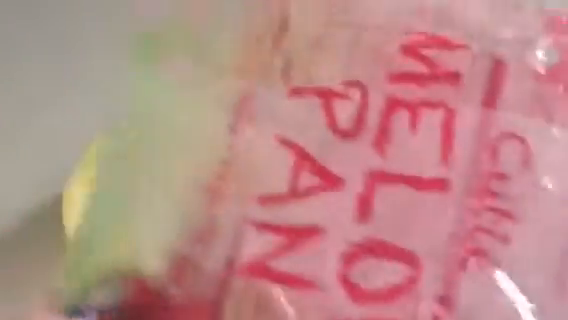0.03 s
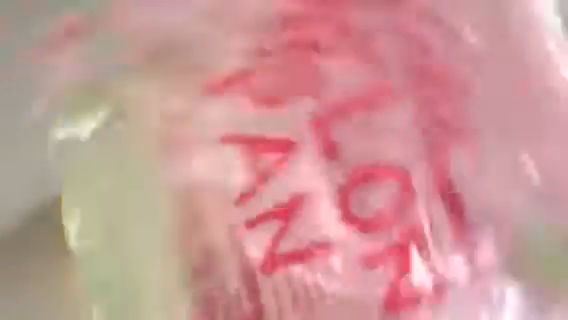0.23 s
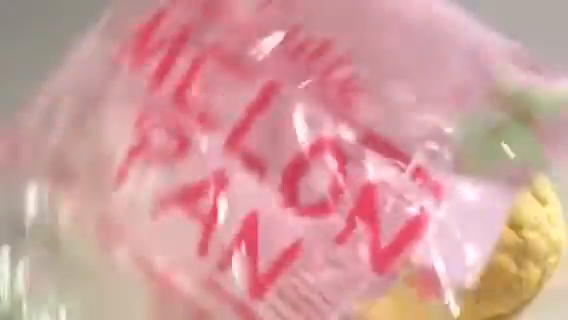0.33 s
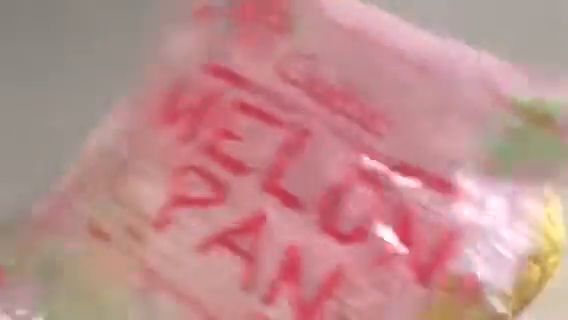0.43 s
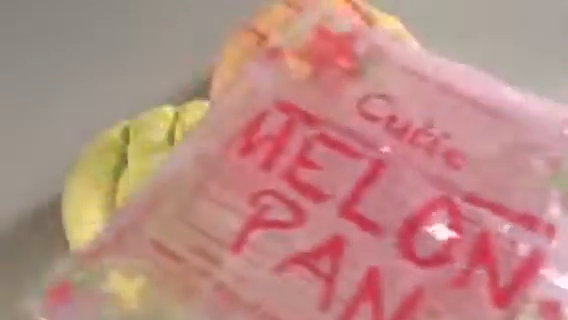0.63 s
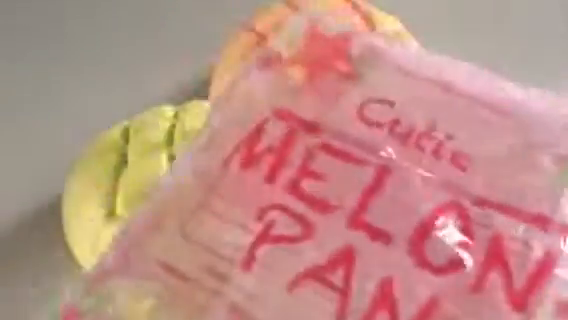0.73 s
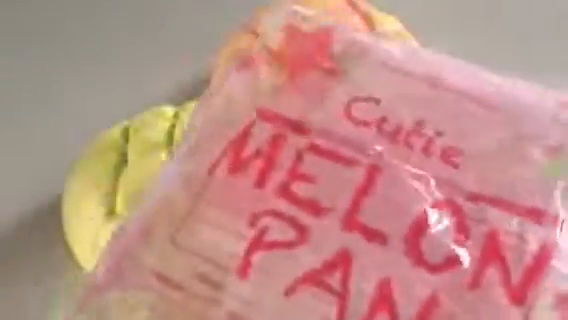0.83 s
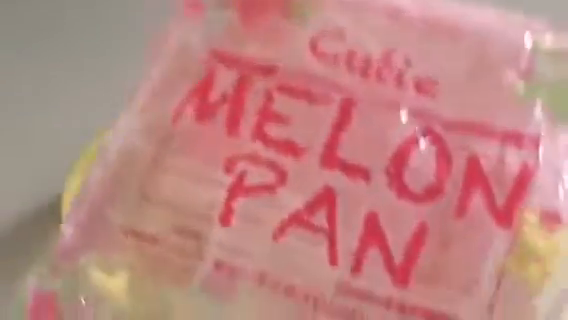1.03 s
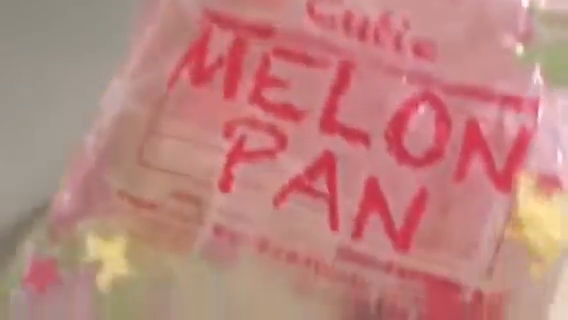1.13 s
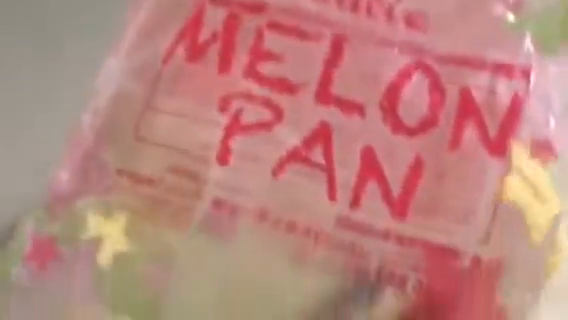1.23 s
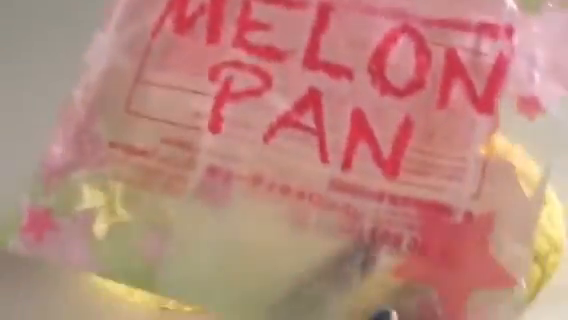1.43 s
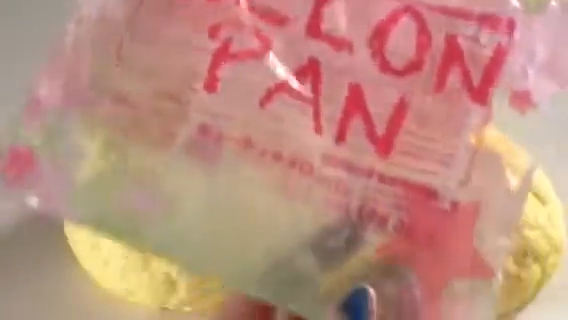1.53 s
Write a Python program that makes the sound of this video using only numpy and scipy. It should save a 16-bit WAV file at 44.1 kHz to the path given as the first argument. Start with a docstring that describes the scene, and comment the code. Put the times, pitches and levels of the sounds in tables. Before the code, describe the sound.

Thin plastic wrapper crinkling close to a small microphone indoors. Small crackles quicken from the start to a bright, loudest snap at 0.22 s, with another strong one at 0.35. Uneven clusters follow around 0.5, 0.65-0.83 and 0.97-1.13 s, then a crisp pair near 1.33, a gap, and light crackles from 1.52 to 1.6. Faint finger friction, short room reflections, low throbbing appliance hum and soft hiss.

```python
"""Thin plastic wrapper handled close to a small microphone in a quiet room.
From the start an appliance hums and throbs (wavering tones) over the hiss of the room (shaped noise),
and fingers slide faintly on the film (noise through resonances).
Soon creases buckle with short snaps, each ringing a few patches of film, the loud ones more.
A wall returns one echo of the handling and a short tail of decaying noise."""
import sys
import numpy as np
from scipy import signal
from scipy.fft import rfft, irfft
from scipy.io import wavfile
from scipy.ndimage import uniform_filter1d

SR = 44100
rng = np.random.default_rng(int(sys.argv[2]) if len(sys.argv) > 2 else 0)


def dump_mix(stems):
    """Bounce the given channels to the path in sys.argv[1] as a 16-bit WAV at rate SR."""
    frames = np.atleast_2d(stems).T  # one column per channel
    limited = np.clip(frames, -1, 1)  # hard clip at full scale
    pcm = np.round(limited * 32767).astype(np.int16)
    wavfile.write(sys.argv[1], SR, pcm)


N = 70560  # length in samples


def undb(db):
    """Turn decibels into an amplitude factor."""
    return 10 ** (np.asarray(db, float) / 20)


def level(x, db):
    """Scale a sound to an rms level in dB."""
    return x * undb(db) / np.sqrt(np.mean(x ** 2))


def ring(x, hz, width):
    """Pass a sound through a resonance with gain 1 at its centre; a narrower width in Hz rings longer."""
    centre = min(hz, 0.42 * SR)
    sharpness = max(hz / width, 0.6)
    b, a = signal.iirpeak(centre, sharpness, fs=SR)
    return signal.lfilter(b, a, x)


def walk(rate):
    """Slow random wander with spread near 1, made by smoothing `rate` random steps per second."""
    step = int(SR / rate)
    stairs = np.repeat(rng.standard_normal(N // step + 1), step)
    smooth = uniform_filter1d(uniform_filter1d(stairs, step), step)
    return 0.61 * smooth[:N]


# Low tones of the appliance. Each row: pitch in Hz, middle level in dB, size of its waver in dB.
LOW_HUM = [(54.06, -63, 4.5), (58, -62.5, -4), (92.7, -56, -1), (116.15, -70, 0), (120.5, -62, 3.5)]
HUM_IN_STEP_S = 0.02336  # all low tones swing upward through zero at this moment
HUM_FADE_DB_PER_S = -0.5


def low_hum():
    """Appliance tones, each wavering a little; tones close in pitch beat against each other as a throb."""
    t = np.arange(N) / SR
    tones = 0
    for hz, db, waver_db in LOW_HUM:
        loudness = undb(db + waver_db * walk(10.7))
        tones = tones + loudness * np.sin(2 * np.pi * hz * (t - HUM_IN_STEP_S))
    fade = undb(HUM_FADE_DB_PER_S * (t - t.mean()))
    return np.sqrt(2) * tones * fade  # the root of 2 makes the tone levels rms


# How the upper hum comes and goes, before a small random waver.
# Each row: time in seconds, level of the lower tone in dB, level of the higher tone in dB.
UPPER_HUM = [(0.0, -95, -68), (0.062, -78, -67), (0.19, -71.5, -69.5), (0.342, -72, -62),
             (0.422, -71.5, -76.5), (0.502, -64, -60.5), (0.582, -63, -80), (0.708, -77, -60.5),
             (0.774, -70, -72), (1.024, -66, -66), (1.108, -70, -72.5), (1.368, -72, -67),
             (1.474, -65.5, -75), (1.6, -63, -68.5)]
# The middle pitches of the lower and the higher tone in Hz.
UPPER_HUM_HZ = (181.9, 276)


def upper_hum():
    """Two overtones of the appliance that waver in level and in pitch."""
    t = np.arange(N) / SR
    times, *levels = np.array(UPPER_HUM).T
    tones = 0
    for hz, db in zip(UPPER_HUM_HZ, levels):
        loudness = undb(np.interp(t, times, db) + 1.5 * walk(14))
        pitch = hz + 1.86 * walk(7.74)
        tones = tones + loudness * np.sin(2 * np.pi * np.cumsum(pitch) / SR)
    return np.sqrt(2) * tones


# Colour of the room noise. Each row: frequency in Hz, relative strength per Hz in dB.
AIR_COLOUR = [(25, -28), (45, -0.5), (100, -1), (200, -6.5), (350, -10), (600, -19), (1100, -23.5),
              (2500, -27), (5000, -32), (9000, -35.5), (12500, -34), (15500, -33.5)]
AIR_DB, AIR_SWELL_DB = -62.5, 3  # level before the slow swell, size of the swell
AIR_TOP_HZ = 15800


def air():
    """Smooth rumble and hiss of room and microphone: white noise, coloured and slowly swelling."""
    f = np.fft.rfftfreq(N, 1 / SR) + 1  # 1 Hz more keeps the logarithm finite
    hz, db = np.array(AIR_COLOUR).T
    colour = undb(np.interp(np.log(f), np.log(hz), db)) * (f > 20) * (f < AIR_TOP_HZ)
    noise = irfft(rfft(rng.standard_normal(N)) * colour, N)
    return level(noise, AIR_DB) * undb(AIR_SWELL_DB * walk(1.48))


# Fingers sliding on the film, before the random grain. Each row: time in seconds, level in dB.
SLIDE_LEVEL = [(0, -67.5), (0.051, -71.5), (.1, -79.5), (.2, -75.5), (.4, -69.5), (0.571, -84),
               (0.601, -70), (.64, -70), (.7, -73.5), (.8, -99), (1.1, -83), (1.25, -88), (1.501, -81),
               (1.6, -70.5)]
# Colour of that hiss. Each row: resonance in Hz, its width in Hz, relative level in dB.
SLIDE_RINGS = [(5800, 600, -10), (4000, 4100, -5.5), (12500, 1700, -11)]


def slide():
    """Grainy friction hiss of skin on film: noise through resonances, its level shaking fast and slowly."""
    hiss = 0
    for hz, width, db in SLIDE_RINGS:
        hiss = hiss + undb(db) * level(ring(rng.standard_normal(N), hz, width), 0)
    times, db = np.array(SLIDE_LEVEL).T
    pressure_db = np.interp(np.arange(N) / SR, times, db)
    grain_db = 2.0 * walk(42.3) + 6.0 * walk(600)
    return level(hiss, 0) * undb(pressure_db + grain_db)


TICKS_PER_S, TICK_HZ = 78, 1180
TICK_DB, TICK_SPREAD_DB = -89.5, 2.5  # rms of all ticks together, spread from tick to tick


def ticks():
    """A sprinkle of faint dull ticks: random impulses through two broad resonances."""
    strengths = undb(TICK_SPREAD_DB * rng.standard_normal(N))
    impulses = (rng.random(N) < TICKS_PER_S / SR) * strengths
    dull = ring(ring(impulses, TICK_HZ, 1000), TICK_HZ, 1800)
    return level(dull, TICK_DB)


# How the film behaves by pitch.
# Each row: ring in Hz, decay of the buckling in seconds, sharpness (ring pitch over its width).
FILM = [(467, 0.0021, 1.37), (1230, 0.0022, 3.6), (3020, 0.0017, 4.74), (6000, 0.0017, 6.46),
        (12300, 0.001, 8.9)]
LEVEL_S, RISE_S = 0.004, 0.0001  # patch levels are rms over LEVEL_S; the rattle rises within RISE_S
KICK = 4.65  # size of the jolt against the rattle
STAGGER_S = 0.0003  # typical delay of a patch's jolt
SKIRT = 2.47  # width of the second resonance over the first


def snap(rings, chance):
    """A jolt and a short rattle of buckling excite the patches of film, each a double resonance."""
    t = np.arange(chance.shape[1]) / SR
    film_hz, film_decay, film_sharpness = np.array(FILM).T
    out = 0
    for (hz, db), noise in zip(rings, chance):
        decay = np.interp(np.log(hz), np.log(film_hz), film_decay)
        sharpness = np.interp(np.log(hz), np.log(film_hz), film_sharpness)
        burst = noise * (1 - np.exp(-t / RISE_S)) * np.exp(-t / decay)
        # the last two noise values choose the moment and direction of the jolt
        jolt_at = int(abs(noise[-1]) * STAGGER_S * SR)
        burst[jolt_at] += KICK * np.sign(noise[-2]) * np.sqrt(decay * SR) / 4
        width = hz / sharpness
        patch = ring(ring(burst, hz, width), hz, SKIRT * width)
        out = out + patch * undb(db) * np.sqrt(LEVEL_S * SR / np.sum(patch ** 2))
    return out


SIDEWAYS_BLUR_HZ = 1120  # the rings merge over this width


def merged(x):
    """Towards the walls: the snap as one short click, its rings smeared and all frequencies in step."""
    blur_bins = int(SIDEWAYS_BLUR_HZ * len(x) / SR)
    power = uniform_filter1d(np.abs(rfft(x)) ** 2, blur_bins, mode="mirror")
    click = irfft(np.sqrt(np.abs(power)), len(x))
    late_click = np.roll(click, SR // 2000)  # moved half a millisecond later
    return late_click * (np.arange(len(x)) < len(x) // 2)


# The clear snaps of the creases.
# Each row: start in seconds, then its patches from large to small, each as ring in Hz, level in dB.
SNAPS = [(0.0215, [(1040, -63.5), (3010, -60.5), (4090, -54), (6370, -66), (8600, -61.0), (10770, -65)]),
         (0.069, [(1260, -66)]), (0.096, [(670, -74), (1010, -57.5), (1870, -60)]), (0.102, [(570, -61),
         (1020, -53.0), (1850, -57), (2780, -61), (3780, -68.0), (5170, -66)]), (0.1101, [(500, -66.5),
         (860, -62), (5500, -66), (9000, -75)]), (0.115, [(1040, -57), (1570, -67), (2030, -58.5),
         (3150, -70)]), (0.1419, [(1060, -59.5), (1510, -70), (3280, -61), (4100, -70)]),
         (0.1536, [(600, -58), (1230, -55.5), (1680, -57), (2150, -55), (2760, -57.5), (3810, -61),
         (4780, -70), (5780, -59)]), (0.1815, [(1150, -50), (1520, -54), (2210, -51), (3100, -55.5),
         (4410, -54), (5600, -57), (6820, -59.5), (8820, -56)]), (0.1961, [(880, -74), (1270, -56),
         (1980, -57), (4510, -58), (5530, -55)]), (0.2008, [(640, -57), (1250, -50.5), (2100, -50),
         (3310, -50), (4040, -52), (6510, -62.5), (8600, -62)]), (0.225, [(520, -59.5), (1610, -39),
         (2240, -40.5), (3010, -33.5), (4520, -28), (5900, -36), (8680, -34), (12060, -32.0)]),
         (0.243, [(830, -52.5), (1410, -54), (3090, -48), (3910, -49), (4840, -63), (6380, -53)]),
         (0.2706, [(610, -66.0), (1250, -57), (5380, -52.5)]), (0.3507, [(520, -50), (1150, -46),
         (1630, -55), (3000, -49.5), (5380, -43), (8180, -45.0), (11400, -42.5), (14970, -51)]),
         (0.369, [(920, -61), (1560, -75), (2150, -59), (3560, -53.5)]), (0.386, [(930, -61), (1260, -57.5),
         (1880, -69)]), (0.4484, [(1160, -60.5), (2030, -60.5)]), (0.4835, [(1160, -59)]),
         (0.4864, [(1090, -58), (1540, -56.0), (3230, -66)]), (0.4887, [(470, -57.5), (1060, -47.5),
         (1650, -49.5), (3010, -52.5), (3820, -60), (5370, -61.0)]), (0.5087, [(1440, -56), (1930, -63)]),
         (0.532, [(1000, -51.0), (1610, -51.5), (2150, -56), (3840, -64), (6520, -66)]),
         (0.5436, [(1070, -55.5), (2360, -65), (3500, -59), (4300, -72)]), (0.6274, [(1010, -59)]),
         (0.6407, [(1150, -58)]), (0.6477, [(990, -52), (1430, -53), (1910, -51.5), (3660, -48),
         (4940, -56), (7580, -68)]), (0.655, [(550, -56), (1290, -42), (1660, -44), (2500, -45.5),
         (3730, -53), (5030, -57), (6230, -54), (8790, -53.5), (10970, -56.5)]), (0.6879, [(2340, -58.5),
         (3390, -70), (6150, -63.5)]), (0.69, [(450, -58.0), (970, -55)]), (0.702, [(550, -59), (1200, -49),
         (1710, -53), (2790, -56.5), (3510, -51), (5290, -48.5), (7430, -57), (12550, -64)]),
         (0.715, [(500, -61), (1100, -54), (1820, -59), (3870, -59.5), (6210, -53.5), (9420, -67),
         (13540, -63)]), (0.728, [(680, -62), (1770, -60.5)]), (0.7642, [(1120, -62.0), (1490, -60.5),
         (1930, -53.5), (3740, -43), (4600, -45), (6880, -58.5), (9080, -61.5)]), (0.8163, [(550, -52.5),
         (1270, -43.5), (2000, -56.5), (2560, -54.0), (3430, -58), (6130, -56.5)]), (0.8306, [(1020, -46.5),
         (1980, -59), (3320, -51.5), (4620, -52.5), (5660, -46), (7880, -60.5), (10970, -57)]),
         (0.9291, [(460, -66.0), (880, -59.0), (1430, -57), (2300, -59), (4060, -68)]),
         (0.956, [(1270, -65)]), (0.9688, [(500, -56), (970, -46), (2220, -57), (3360, -51), (4480, -51.5),
         (6690, -53.5), (11350, -72)]), (0.9983, [(900, -50), (1710, -58), (2550, -65), (3520, -76)]),
         (1.002, [(890, -49.5), (1260, -62), (1630, -65.0)]), (1.016, [(1090, -68)]),
         (1.026, [(1120, -47.5), (1700, -51), (2360, -53), (4510, -71), (6210, -48), (8820, -57.5),
         (11900, -66.5)]), (1.0394, [(990, -57.5)]), (1.053, [(1070, -69), (2920, -69)]),
         (1.0692, [(930, -59), (2300, -69)]), (1.0865, [(990, -52), (1820, -61.5), (3650, -75),
         (6560, -57)]), (1.0884, [(450, -60), (720, -53), (1480, -54.0), (2270, -55), (3400, -41.5),
         (4230, -62), (5310, -49), (6800, -45.0), (9030, -50.5), (11250, -48)]), (1.131, [(620, -65.0),
         (1230, -53.5), (2640, -63), (5600, -63), (8580, -65)]), (1.179, [(470, -66)]),
         (1.206, [(950, -59.5), (3420, -64), (4460, -72), (5490, -67), (10500, -72.5)]),
         (1.329, [(560, -56.5), (950, -53), (1310, -60), (2300, -51.5), (3510, -54), (4710, -52.5),
         (6660, -67)]), (1.339, [(1030, -47.5), (2130, -54), (3530, -47.5), (4750, -47.5), (5960, -44.0),
         (7710, -50.5), (9920, -52.5), (12400, -49)]), (1.367, [(1300, -63)]), (1.5169, [(1460, -65)]),
         (1.5307, [(550, -74), (1120, -58), (1570, -66), (2500, -64.5), (4220, -63), (5810, -63)]),
         (1.5392, [(480, -58.5), (1030, -58), (1560, -60), (5100, -64), (9500, -66)]), (1.5425, [(640, -59),
         (1070, -57)]), (1.5479, [(400, -54), (940, -65), (1720, -58), (3110, -64), (4300, -60),
         (5590, -61), (13560, -61)]), (1.569, [(1340, -52), (2490, -59), (3410, -55.0), (5570, -49),
         (7800, -66), (11400, -63)]), (1.58, [(5770, -65.5)])]
FLAP_HZ, FLAP_DB = 380, -11  # dull flap of the whole sheet, this far under the largest patch
# thin tick of the crease, under the smallest patch and weaker the further that rings from EDGE_HZ
EDGE_HZ, EDGE_DB, EDGE_DB_PER_OCTAVE = 14400, -6.0, -3


def snaps():
    """Buckling creases, each with flap and edge tick: towards the microphone, and towards the walls."""
    size = 640  # samples in one snap
    out = np.zeros((2, N + size))
    chances = rng.standard_normal((len(SNAPS), 12, size))  # noise for up to 12 rings a snap
    for (start, rings), chance in zip(SNAPS, chances):
        flap = (FLAP_HZ, rings[0][1] + FLAP_DB)
        smallest_hz, smallest_db = rings[-1]
        octaves = abs(np.log2(EDGE_HZ / smallest_hz))
        edge = (EDGE_HZ, smallest_db + EDGE_DB + EDGE_DB_PER_OCTAVE * octaves)
        near = snap([flap, edge, *rings], chance)
        i = int(start * SR)
        out[:, i:i + size] += [near, merged(near)]
    return out[:, :N]


ECHO_S, ECHO_DB = 0.0057, -17
ECHO_BASS_CUT = 1  # the echo subtracts this much of the sample before, which thins the bass
WALL_DULL_HZ = 11300  # walls swallow the top
ROOM_DB, ROOM_RISE_S = -12, 0.00076  # energy of the tail, time it takes to build up
ROOM_GRAIN_DB = 4  # single reflections stand out of the tail
# Five bands of the tail, low to high; the edges of each in Hz.
BAND_FROM_HZ, BAND_TO_HZ = (300, 2500, 4500, 6500, 10000), (2500, 4500, 6500, 10000, SR)
# For each band in turn: the seconds it takes to fall by 60 dB.
ROOM_T60_S = (0.23, 0.23, 0.23, 0.27, 0.26)
# For each band in turn: its relative level in dB.
ROOM_TILT_DB = (1, 2, -1, 1.5, -0.5)


def room(x):
    """One early echo and a diffuse tail: noise that decays at its own pace in each band."""
    t = np.arange(SR // 2) / SR
    f = np.fft.rfftfreq(len(t), 1 / SR)
    tail = 0
    for low, high, t60, db in zip(BAND_FROM_HZ, BAND_TO_HZ, ROOM_T60_S, ROOM_TILT_DB):
        spectrum = rfft(rng.standard_normal(len(t)))
        band = irfft(spectrum * ((f >= low) & (f < high)), len(t))
        tail = tail + undb(db) * band * undb(-60 * t / t60)
    grain = undb(ROOM_GRAIN_DB * walk(1500)[:len(t)])
    tail = tail * grain * (1 - np.exp(-(t / ROOM_RISE_S) ** 2))
    tail = tail * undb(ROOM_DB) / np.sqrt(np.sum(tail ** 2))
    i = int(ECHO_S * SR)
    tail[i:i + 2] += undb(ECHO_DB) * np.array([1, -ECHO_BASS_CUT])
    b, a = signal.butter(2, WALL_DULL_HZ, fs=SR)
    return signal.fftconvolve(signal.lfilter(b, a, x), tail)[:N]


def scene():
    """Hum and air lie under the handling, which is heard directly and by way of the room."""
    background = low_hum() + upper_hum() + air()
    front, sideways = slide() + ticks() + snaps()
    return (background + front + room(sideways))[None]


MIC_ROLL_HZ, TOP_HZ = 14500, 16500


def record(dry):
    """The microphone rolls off gently in the treble and the chain cuts the top."""
    roll_off = signal.butter(3, MIC_ROLL_HZ, fs=SR, output="sos")
    top_cut = signal.ellip(10, 0.5, 70, TOP_HZ, fs=SR, output="sos")
    return signal.sosfilt(top_cut, signal.sosfilt(roll_off, dry))


dry = scene()
out = record(dry)
dump_mix(out)
```